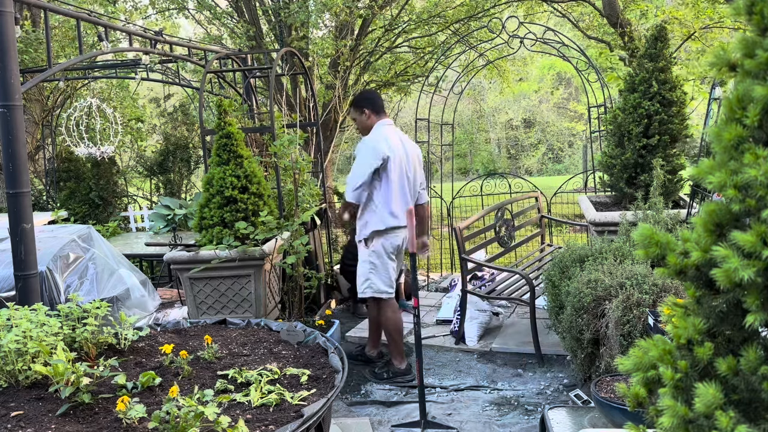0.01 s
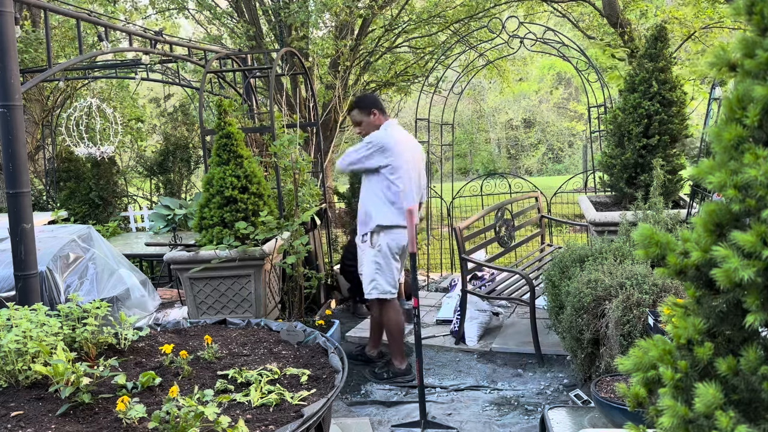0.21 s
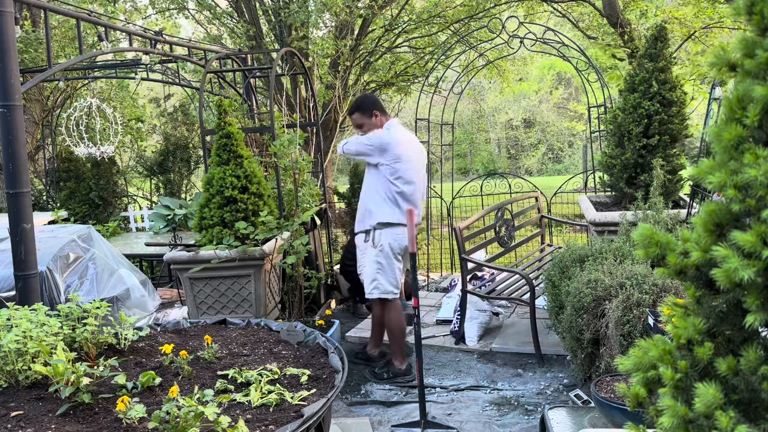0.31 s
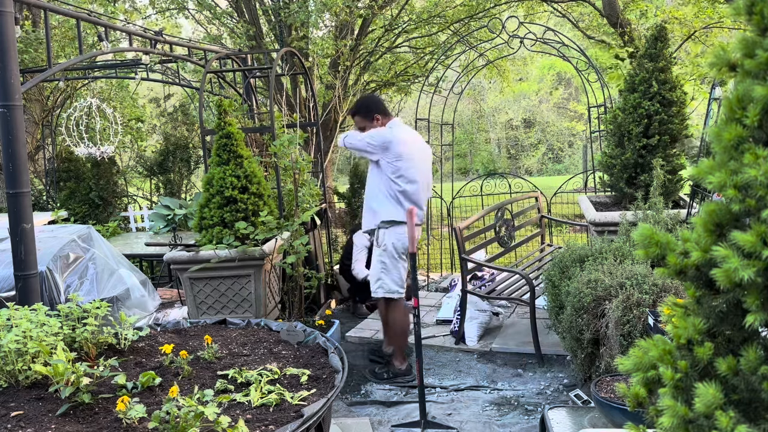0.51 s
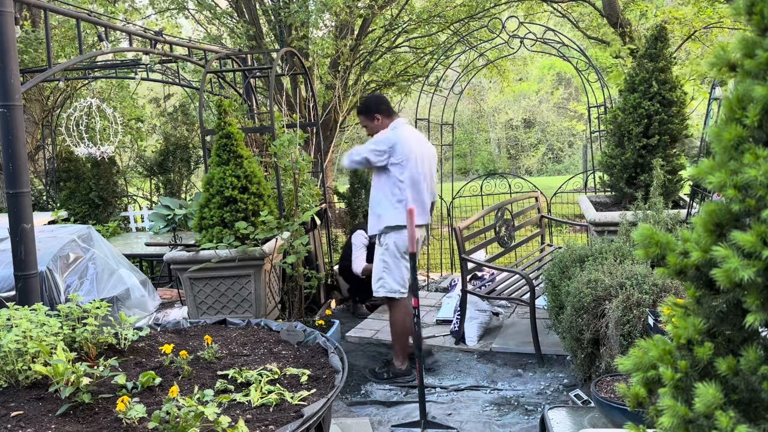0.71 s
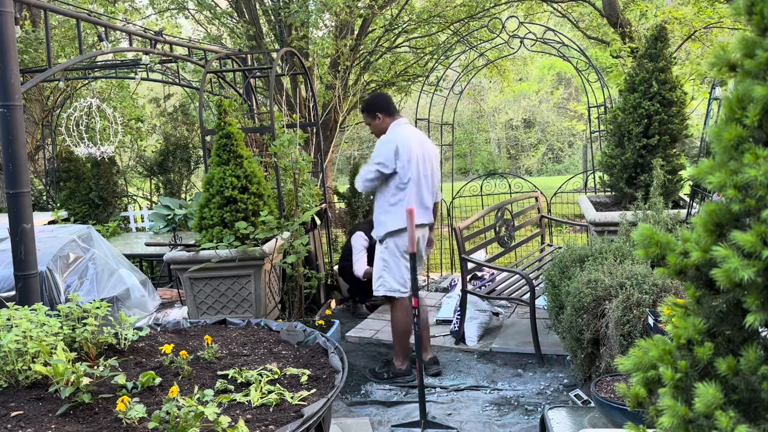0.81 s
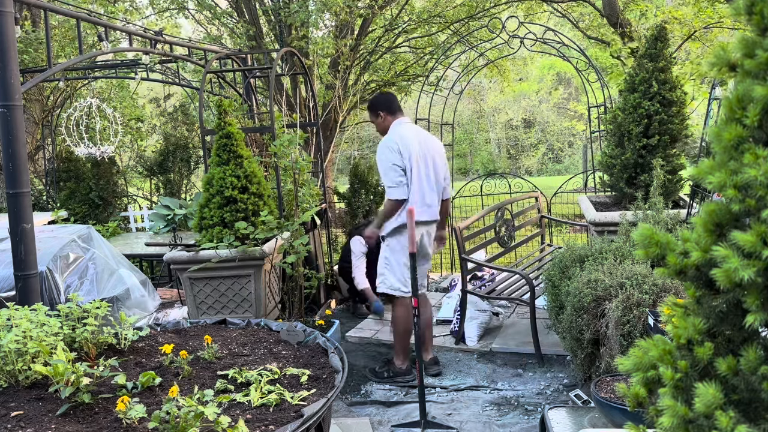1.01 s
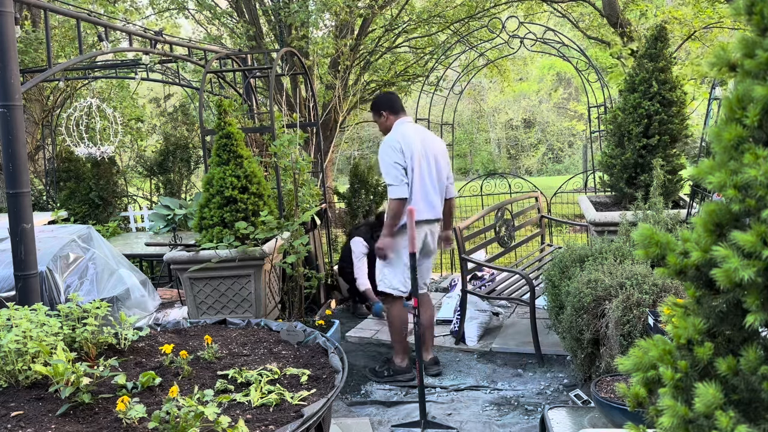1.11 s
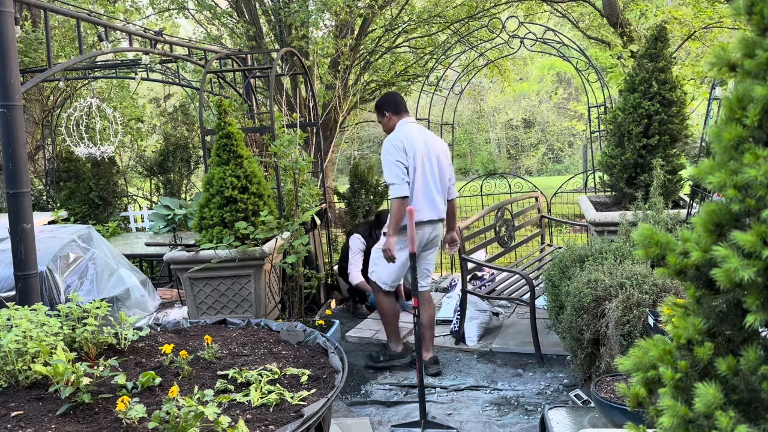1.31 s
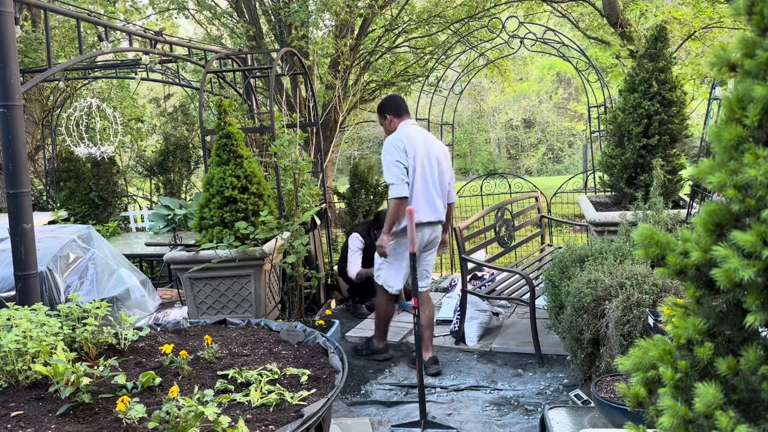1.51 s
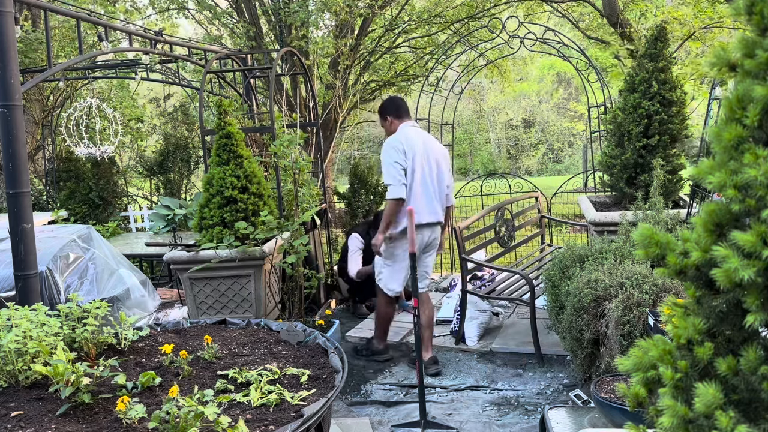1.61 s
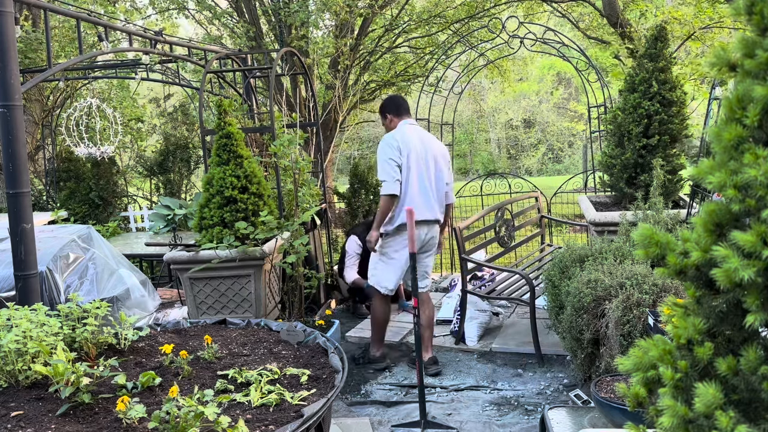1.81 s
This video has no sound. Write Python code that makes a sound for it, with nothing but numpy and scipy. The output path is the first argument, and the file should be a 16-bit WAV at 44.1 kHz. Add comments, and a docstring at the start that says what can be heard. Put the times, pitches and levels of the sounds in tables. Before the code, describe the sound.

A heavy concrete block thuds down hard with a sharp gritty crack, then lands again duller and softer-edged less than a second later; soft shoe scuffs between and after, quiet garden, faint distant engine, medium-close stereo microphone.

```python
"""A garden patio: a heavy concrete block is knocked down twice onto the bed, over a quiet outdoor background.
Each blow is a filtered tick with gritty noise, a short knock and ring of decaying sines for the block, and a
deep thud of lower sines for the ground; noise bands that die away are the garden scattering it back.
Soft scuffs of shaped noise and grains come around the blows. A bird whistles faintly in gliding sines,
far traffic rumbles as banded noise, and one engine hums in two partials that dip and then rise in pitch."""
import sys
import numpy as np
from scipy import signal
from scipy.io import wavfile

SR = 44100
rng = np.random.default_rng(int(sys.argv[2]) if len(sys.argv) > 2 else 0)


def transcribe(signal):
    """Save signal, clipped to [-1, 1], as a 16-bit WAV file at the path in sys.argv[1]."""
    frames = np.atleast_2d(signal).T
    limited = np.clip(frames, -1, 1)
    pcm = np.round(limited * 32767).astype(np.int16)
    wavfile.write(sys.argv[1], SR, pcm)


N = 81585
TIME = np.arange(N) / SR

# The two blows of the block. Each row: start in seconds, thud level in dB, lag of the ground in seconds,
# knock level in dB, ring level in dB, crack level in dB, crack low cut in Hz, crack high cut in Hz,
# scatter level in dB.
BLOWS = [(.2007, 1, 0.0011, -0.5, -0.5, -5, 920, 4260, 0.5),
         (1.0311, 1.6, 0.001194, -12, -7.5, -17.5, 1930, 11000, -3.5)]
GRAIN_LIKENESS = 0.49  # left-right likeness of crushed grains, 1 is mono


def from_db(db):
    """Decibels to gain."""
    return 10 ** (np.asarray(db) / 20)


def rms_one(x):
    """Scale to unit rms."""
    return x / np.sqrt(np.mean(x ** 2) + 1e-20)


def at_hz(points, hz):
    """Read a table on a log-frequency axis."""
    table_hz, values = np.array(points).T
    return np.interp(np.log(hz), np.log(table_hz), values)


def filtered(x, hz, kind, order=2):
    """Butterworth filter."""
    sos = signal.butter(order, np.clip(hz, 10, .45 * SR), kind, fs=SR, output="sos")
    return signal.sosfilt(sos, x + 1e-18)


def drift(rate):
    """Slow random movement with spread 1: noise through two equal poles at rate Hz."""
    step = 40  # samples between computed points
    pole = np.exp(-2 * np.pi * step * rate / SR)
    noise = rng.standard_normal(N // step + 2002)
    slow = signal.lfilter([1], [1, -2 * pole, pole * pole], noise)[2000:]  # skip the settling
    return np.interp(np.arange(N) / step, np.arange(len(slow)), rms_one(slow))


def stereo(mid, side, alike):
    """Two unrelated signals to a left-right pair of given likeness."""
    alike = np.clip(alike, -1, 1)
    opposite = side * np.array([[1], [-1]])
    return (np.sqrt(1 + alike) * mid + np.sqrt(1 - alike) * opposite) / np.sqrt(2)


def noise_bands(spectrum):
    """Half-octave bands of diffuse noise as (Hz, stereo signal); together about rms 1."""
    # Width of diffuse sound. Each row: frequency in Hz, left-right likeness from -1 to 1.
    likeness = [(60, .99), (200, 0.82), (500, 0.52), (1000, -0.038), (3000, 0.71), (7000, 0.67),
                (13000, -0.22)]
    edges = 24 * 2 ** np.arange(0, 9.6, .5)
    centres = np.sqrt(edges[1:] * edges[:-1])
    gains = from_db(at_hz(spectrum, centres))
    gains = gains / np.sqrt(np.sum(gains ** 2 * np.diff(edges)) * 2 / SR)
    white = rng.standard_normal((2, 2, N + SR // 10))  # two noise pairs, taken in turn by neighbouring bands
    bands = []
    for k, hz in enumerate(centres):
        mid, side = filtered(white[k % 2], edges[k:k + 2], "band")[:, -N:]
        bands.append((hz, gains[k] * stereo(mid, side, at_hz(likeness, hz))))
    return bands


def since(s):
    """Seconds since a moment, zero before it."""
    return np.maximum(TIME - s, 0)


def dying(t, t60):
    """Exponential decay, 60 dB in t60 seconds, that starts when t leaves zero."""
    return (t > 0) * np.exp(-np.minimum(np.log(1000) * t / t60, 40))


def ring(t, modes, signs, swell_cycles):
    """Sine modes that swell over a part of their first cycles and die away."""
    out = np.zeros(N)
    for (hz, db, t60), sign in zip(modes, signs):
        swell = 1 - np.exp(-(t * hz / swell_cycles) ** 2)
        out += sign * from_db(db) * dying(t, t60) * swell * np.sin(2 * np.pi * hz * t)
    return out


def far_traffic():
    """Flickering bands of rumble and faint leaf hiss, and an engine hum of two wandering partials."""
    # Distant traffic and leaves in the air. Each row: frequency in Hz, relative density in dB per Hz.
    air_spectrum = [(25, -31), (40, -17.5), (62, 3), (90, -6.5), (140, -13.5), (250, -17), (500, -19.5),
                    (1000, -24), (1500, -39.5), (2400, -40.5), (4000, -53.5), (7500, -56.5), (11000, -54.5),
                    (15000, -62)]
    # The far engine. Each row: time in seconds, central firing frequency in Hz, central rms level in dB.
    engine_path = [(0, 98, -49), (.38, 92, -47), (.55, 96, -57), (.72, 99, -47), (1.0, 102, -46),
                   (1.3, 103.5, -43.5), (1.6, 106.5, -44), (1.85, 107, -45)]
    air_db, air_flicker_db, air_low_hz = -45.5, 1.97, 33.3
    wander_hz, waver_db, second_db = 2.57, 2, -20.5  # second partial relative to the first

    air = sum(band * from_db(air_flicker_db * drift(8)) for _, band in noise_bands(air_spectrum))
    air = from_db(air_db) * filtered(air, air_low_hz, "high", order=4)

    s, hz, db = np.transpose(engine_path)
    firing_hz = np.interp(TIME, s, hz) + wander_hz * drift(11.5)
    turn = 2 * np.pi * np.cumsum(firing_hz) / SR
    hum = np.sin(turn) + from_db(second_db) * np.sin(2 * turn)
    engine_gain = from_db(np.interp(TIME, s, db) + waver_db * drift(21))
    return air + np.sqrt(2) * hum * engine_gain


def bird():
    """Faint gliding sine whistles whose pitch wavers and level flutters."""
    # Whistles. Each row: start in seconds, length in seconds, central start frequency in Hz,
    # central end frequency in Hz, central peak level in dB.
    whistles = [(.6, .09, 2230, 2260, -72), (1.09, .19, 2100, 2190, -70.5)]
    waver_hz, flutter_db = 45, 2
    out = np.zeros(N)
    for s, length, start_hz, end_hz, db in whistles:
        along = np.clip(since(s) / length, 0, 1)
        hz = start_hz + (end_hz - start_hz) * along + waver_hz * drift(50)
        arch = np.sqrt(4 * along * (1 - along))
        gain = from_db(db + flutter_db * drift(30))
        out += gain * arch * np.sin(2 * np.pi * np.cumsum(hz) / SR)
    return out


def scuffs(rough_db=1.5):
    """Soles and cloth rub in short uneven strokes of noise, crunching a little sand as sparse grains."""
    # Strokes. Each row: start, rise, hold and fall in seconds, rub level in dB, hiss level in dB.
    strokes = [(-.03, 0.037, .07, 0.066, -92.5, -65), (0.081, 0.017, 0.0085, 0.063, -94, -62),
               (0.731, 0.011, 0.026, 0.031, -54, -73.5), (0.783, 0.021, 0.025, 0.045, -58.5, -73),
               (1.526, 0.0037, .006, 0.028, -63, -85), (1.656, 0.035, 0.042, .04, -54, -64.5),
               (1.731, 0.036, 0.035, 0.12, -53, -67.5)]
    # Sole on paving. Each row: frequency in Hz, relative density in dB per Hz.
    rub_spectrum = [(150, -1), (400, -1.5), (900, 1), (1400, 1.5), (2100, -6.5), (4500, -22.5), (8000, -33),
                    (15000, -34)]
    # Fine hiss of cloth and sand. Each row: frequency in Hz, relative density in dB per Hz.
    hiss_spectrum = [(500, 4), (2500, -6), (5000, -5), (8000, -3), (11000, -4.5), (15000, -5.5)]
    sand_per_s, sand_db = 1700, -8.5  # level relative to the rub
    sand_range_hz = [1150, 3260]

    rub_gain, hiss_gain = np.zeros(N), np.zeros(N)
    for s, rise, hold, fall, rub_db, hiss_db in strokes:
        stroke = np.interp(TIME, s + np.cumsum([0, rise, hold, fall]), [0, 1, 1, 0])
        rub_gain += from_db(rub_db) * stroke
        hiss_gain += from_db(hiss_db) * stroke

    grains = rng.standard_normal((2, N)) * (rng.random(N) < sand_per_s / SR)
    sand = rms_one(filtered(stereo(*grains, GRAIN_LIKENESS), sand_range_hz, "band"))
    sole = sum(band for _, band in noise_bands(rub_spectrum)) + from_db(sand_db) * sand
    hiss = sum(band for _, band in noise_bands(hiss_spectrum))
    return (rub_gain * sole + hiss_gain * hiss) * from_db(rough_db * drift(170))


def garden_scatter():
    """Planters, fence and foliage return a short diffuse tail, each noise band with its own decay."""
    # Colour of the tail. Each row: frequency in Hz, relative density in dB per Hz.
    tail_spectrum = [(60, -7), (170, 11), (400, 4.5), (800, -8.5), (1500, -18.5), (3000, -27),
                     (7000, -35.5), (15000, -46.5)]
    # Decay of the tail. Each row: frequency in Hz, time to fall 60 dB in seconds.
    tail_t60 = [(100, 0.26), (500, 0.23), (2000, 0.33), (6000, 0.34), (15000, 0.43)]
    base_db, rise_s = -25.5, 0.002  # the level of each blow adds to the base
    starts = []
    for s, *_, db in BLOWS:
        t = since(s)
        starts.append((t, from_db(base_db + db) * (1 - np.exp(-t / rise_s))))
    out = np.zeros((2, N))
    for hz, band in noise_bands(tail_spectrum):
        out += band * sum(rise * dying(t, at_hz(tail_t60, hz)) for t, rise in starts)
    return out


def thuds():
    """The block knocks and rings briefly, and the ground booms under it, all as decaying modes."""
    # Ground under the block. Each row: frequency in Hz, relative level in dB, time to fall 60 dB in seconds.
    ground_modes = [(62.4, -30, 0.25), (94, -14, 0.13), (115.5, -7.5, 0.056), (173.1, -13.5, 0.097),
                    (242, -28.5, 0.14), (348.5, -0.5, 0.018), (378.3, -7.5, 0.022), (487, -19.5, 0.027)]
    # Starting direction of each ground mode: one sign per mode.
    ground_signs = [-1, 1, -1, 1, -1, -1, 1, 1]
    # Low knock of the block, strong when it lands hard. Each row: frequency in Hz, relative level in dB,
    # time to fall 60 dB in seconds.
    knock_modes = [(731.4, -12.5, 0.034)]
    # Higher ring of the block. Each row: frequency in Hz, relative level in dB, time to fall 60 dB in seconds.
    block_modes = [(1192, -25, 0.042), (1623, -40.5, 0.022), (1670, -27, 0.018), (2050, -34, 0.031),
                   (2526, -38.5, 0.038)]
    block_signs = (-1) ** np.arange(len(block_modes))
    ground_swell, block_swell = 0.4, 1.06  # cycles
    out = np.zeros(N)
    for s, thud_db, lag, knock_db, ring_db, *_ in BLOWS:
        out += from_db(thud_db) * ring(since(s + lag), ground_modes, ground_signs, ground_swell)
        out += from_db(knock_db) * ring(since(s), knock_modes, [-1], block_swell)
        out += from_db(ring_db) * ring(since(s), block_modes, block_signs, block_swell)
    return out


def cracks():
    """Stone meets stone in one sharp tick per blow, followed by a dying spray of crushed grains."""
    # Broad resonances added by the contact. Each row: frequency in Hz, width in Hz, gain of the added part in dB.
    resonances = [(2300, 880, -1), (3160, 800, -2.5), (7200, 570, -0.5)]
    # Levels are relative to the tick of each blow.
    crush_db, crush_t60_s = -10, 0.002  # the contact crumbles
    grit_db, grit_t60_s, grit_per_s = -26.5, 0.063, 6000  # sand crushed under the block
    out = np.zeros((2, N))
    for s, *_, crack_db, low_hz, dull_hz, _ in BLOWS:
        t = since(s)
        grains = rms_one(rng.standard_normal((2, N)) * (rng.random(N) < grit_per_s / SR))
        crush = from_db(crush_db) * rng.standard_normal((2, N)) * dying(t, crush_t60_s)
        grit = from_db(grit_db) * grains * dying(t, grit_t60_s)
        tick = signal.unit_impulse(N, int(s * SR))
        contact = stereo(*(crush + grit), GRAIN_LIKENESS) - tick
        bright = filtered(contact, low_hz, "high", order=4)
        out += from_db(crack_db) * filtered(bright, dull_hz, "low")
    ringing = np.zeros((2, N))
    for hz, width, db in resonances:
        ringing += from_db(db) * signal.lfilter(*signal.iirpeak(hz, hz / width, fs=SR), out)
    return out + ringing


def scene():
    """The background, scuffs, and the blows with their tails."""
    return far_traffic() + bird() + scuffs() + garden_scatter() + thuds() + cracks()


def record(dry):
    """The recorder cuts the top with a steep low-pass."""
    cutoff_hz = 15900
    return signal.sosfilt(signal.ellip(10, .1, 90, cutoff_hz, fs=SR, output="sos"), dry)


dry = scene()
out = record(dry)
transcribe(out)
```